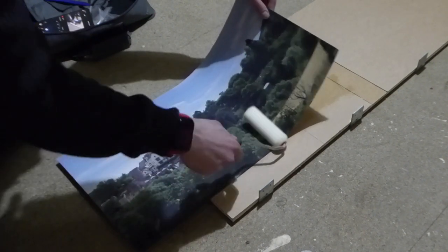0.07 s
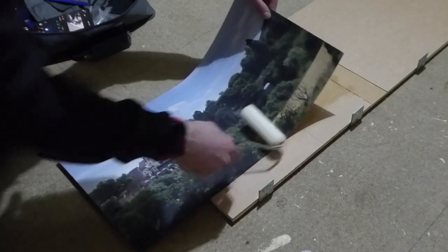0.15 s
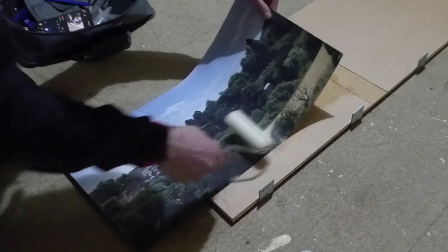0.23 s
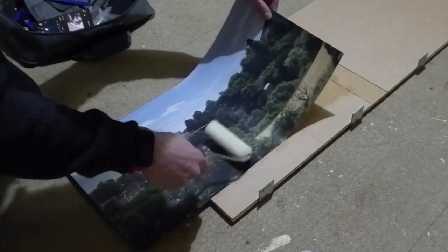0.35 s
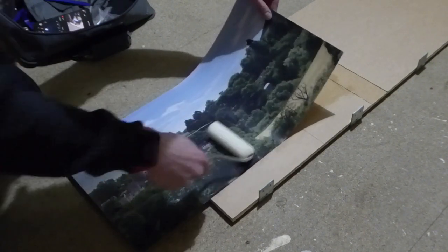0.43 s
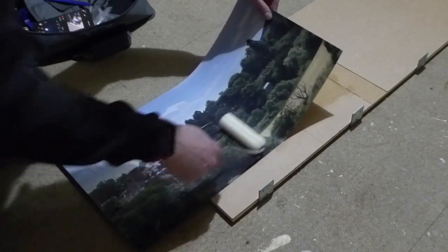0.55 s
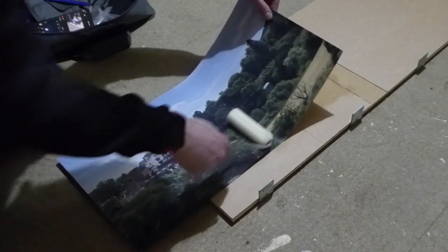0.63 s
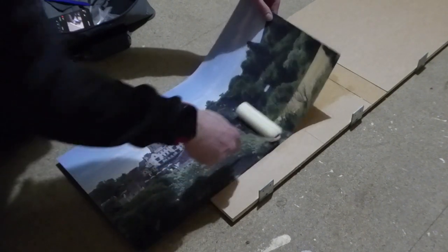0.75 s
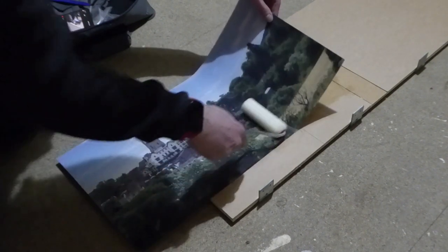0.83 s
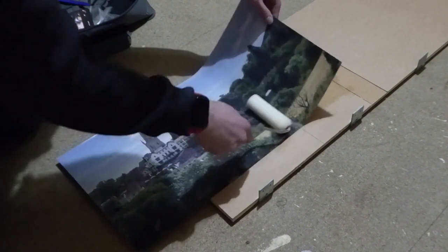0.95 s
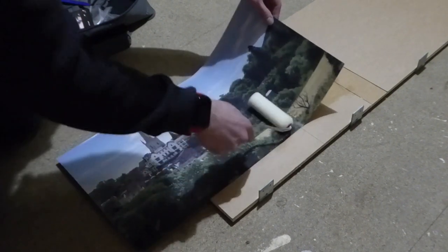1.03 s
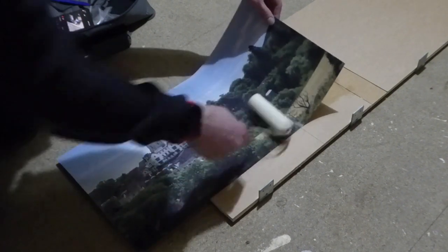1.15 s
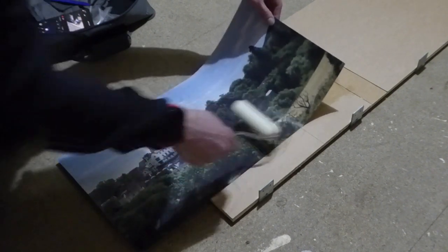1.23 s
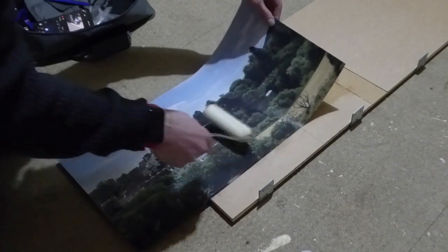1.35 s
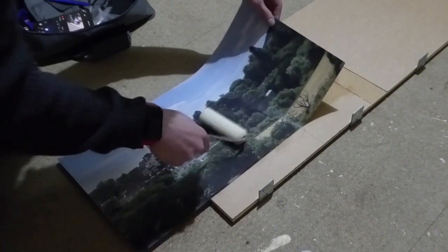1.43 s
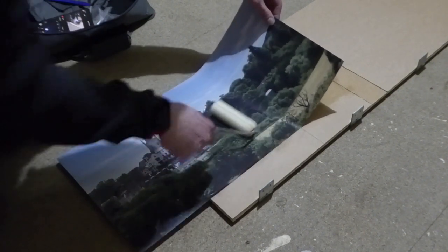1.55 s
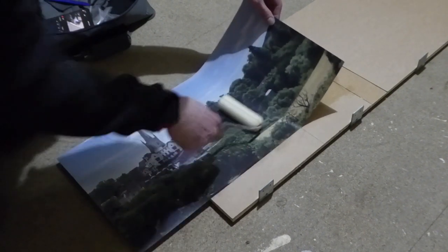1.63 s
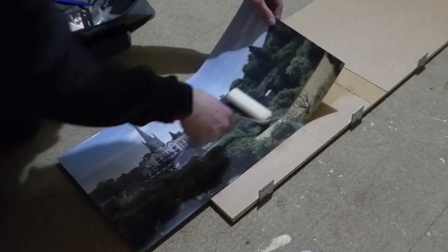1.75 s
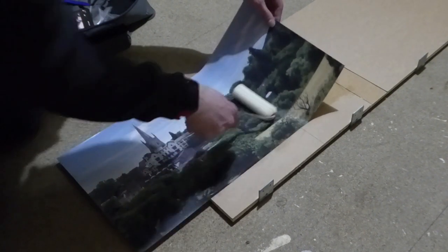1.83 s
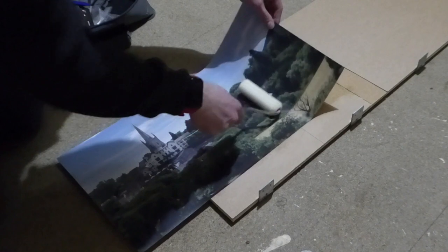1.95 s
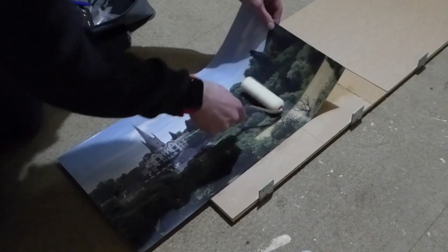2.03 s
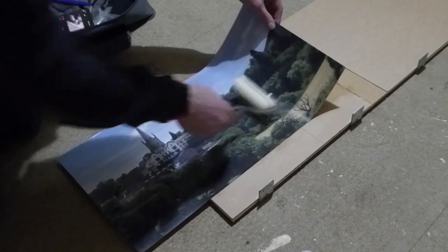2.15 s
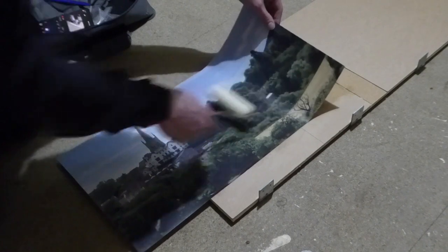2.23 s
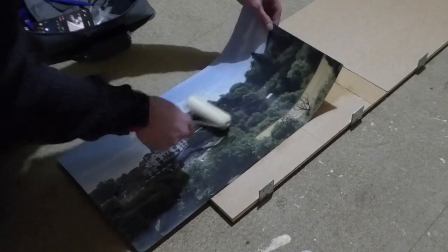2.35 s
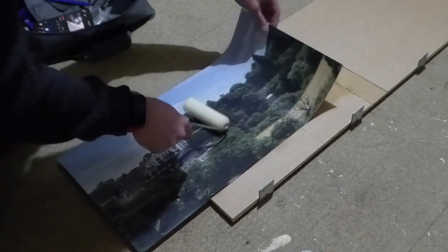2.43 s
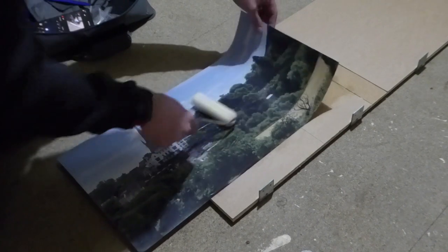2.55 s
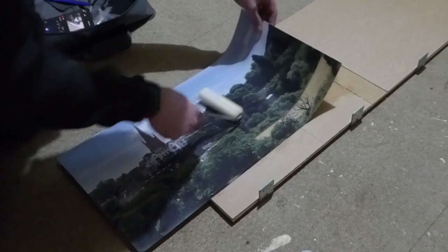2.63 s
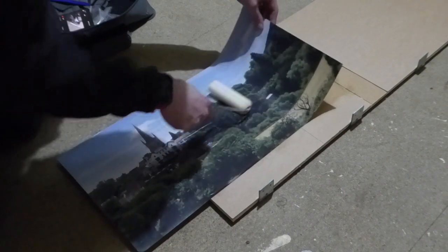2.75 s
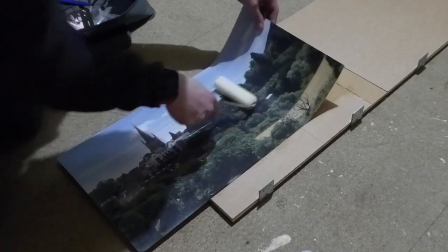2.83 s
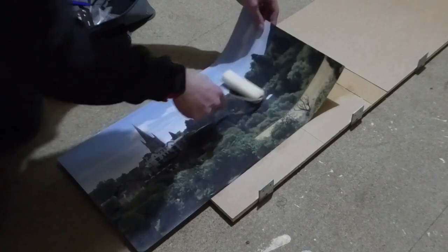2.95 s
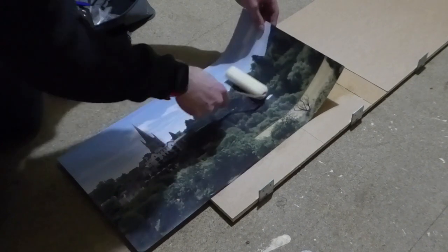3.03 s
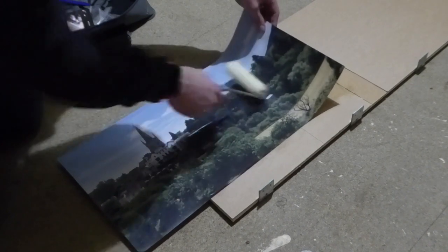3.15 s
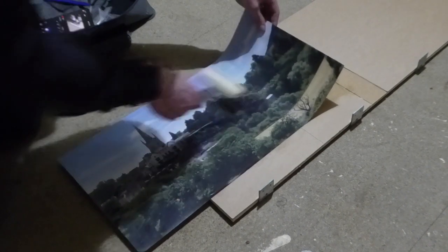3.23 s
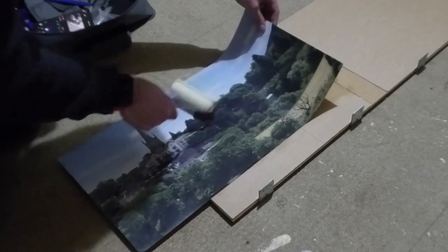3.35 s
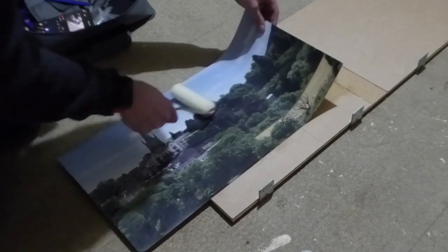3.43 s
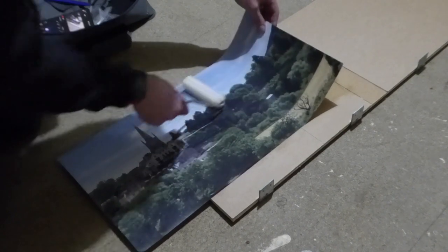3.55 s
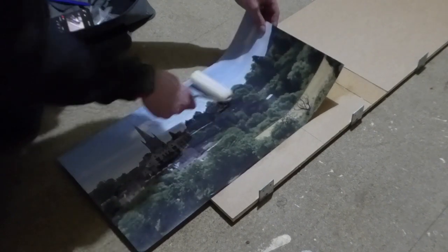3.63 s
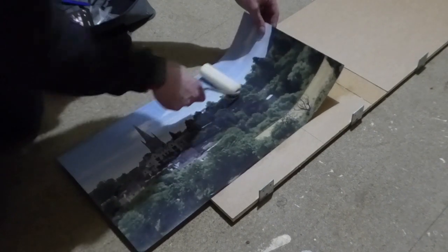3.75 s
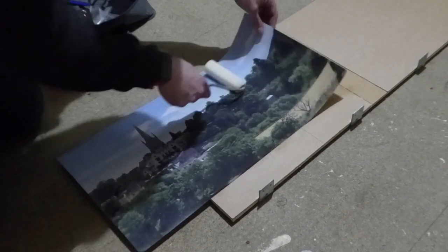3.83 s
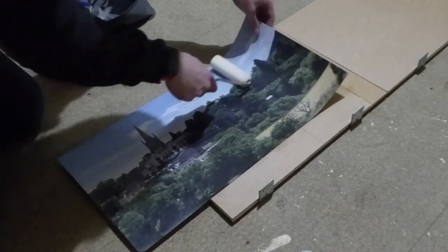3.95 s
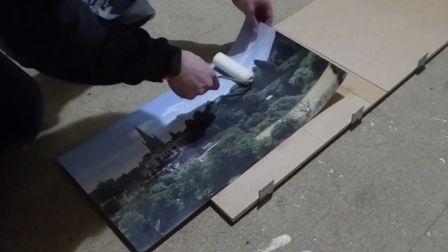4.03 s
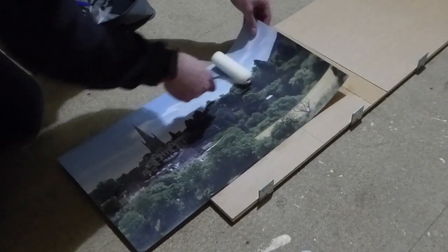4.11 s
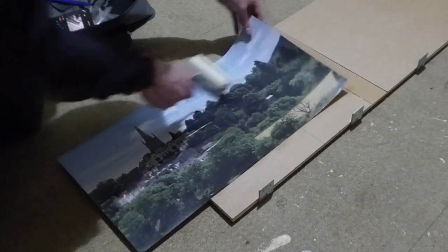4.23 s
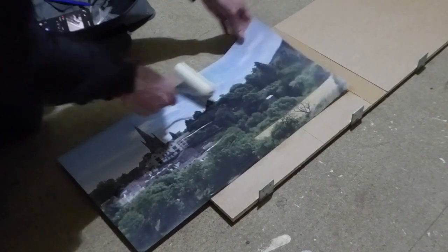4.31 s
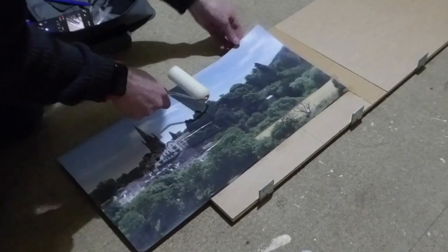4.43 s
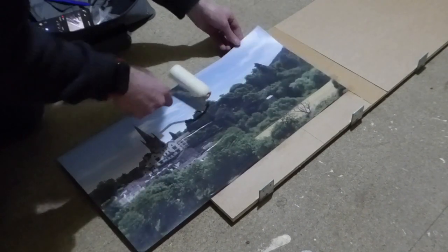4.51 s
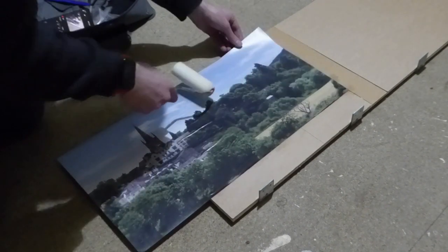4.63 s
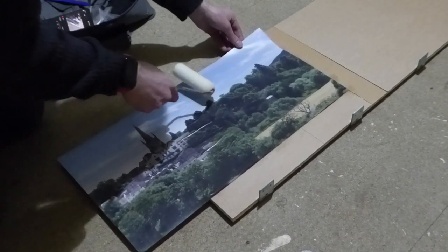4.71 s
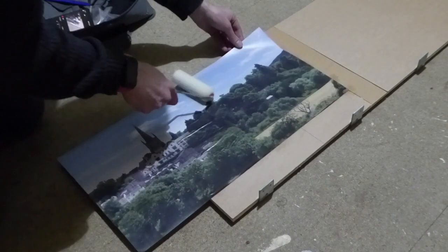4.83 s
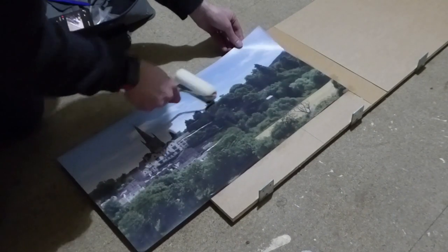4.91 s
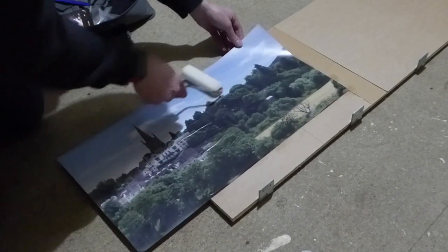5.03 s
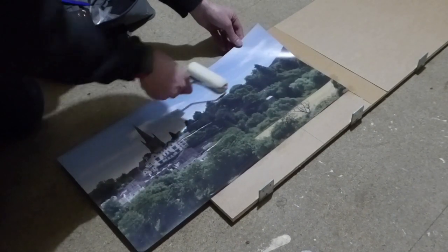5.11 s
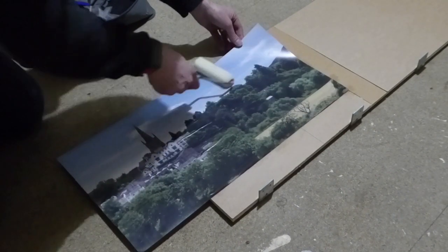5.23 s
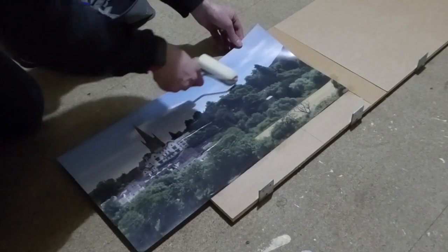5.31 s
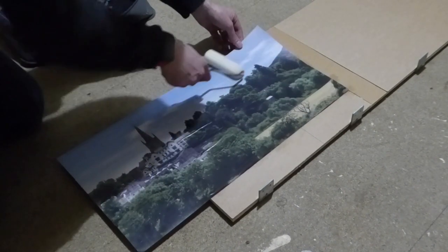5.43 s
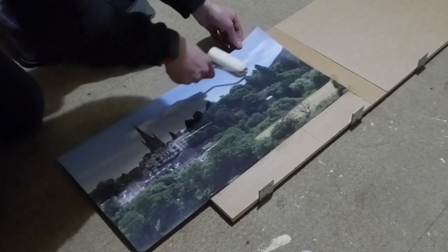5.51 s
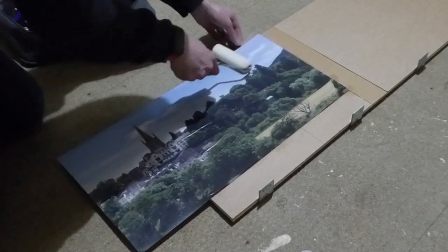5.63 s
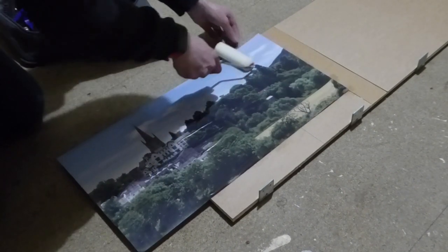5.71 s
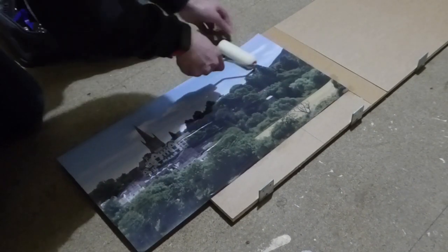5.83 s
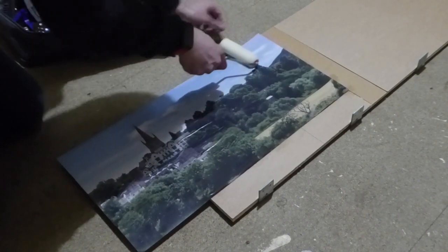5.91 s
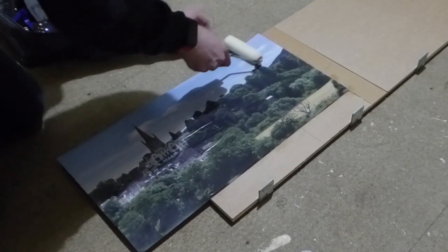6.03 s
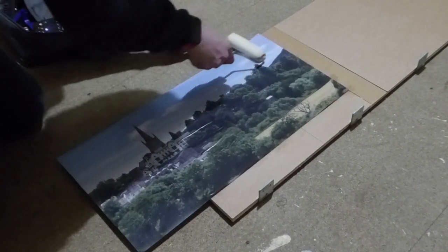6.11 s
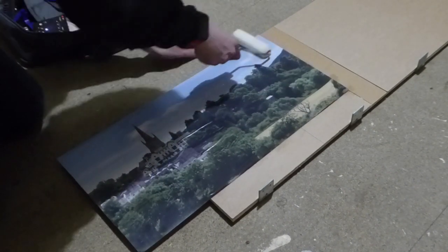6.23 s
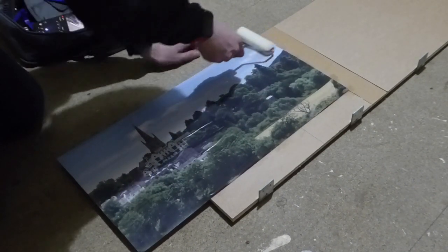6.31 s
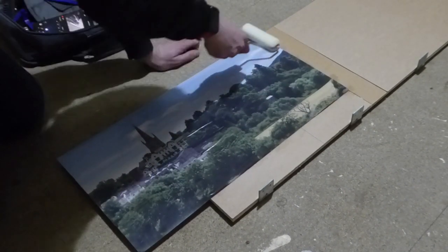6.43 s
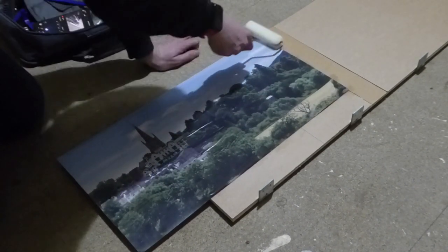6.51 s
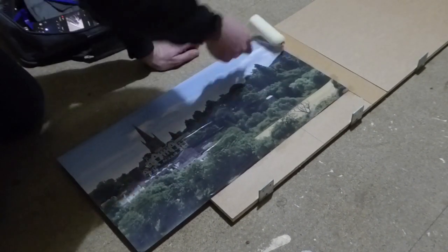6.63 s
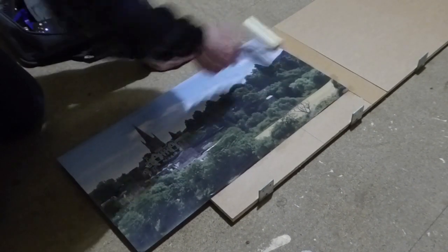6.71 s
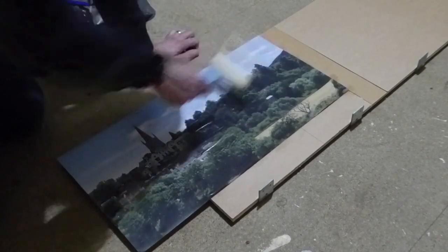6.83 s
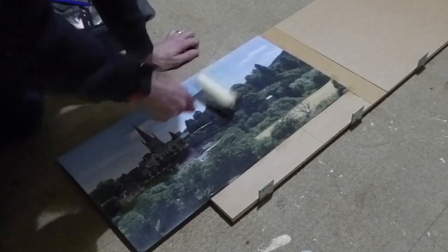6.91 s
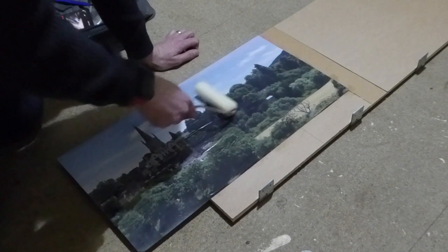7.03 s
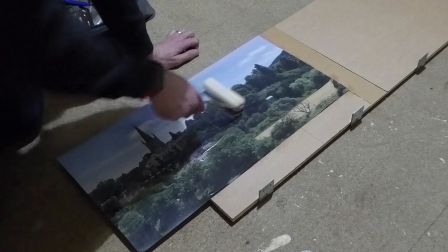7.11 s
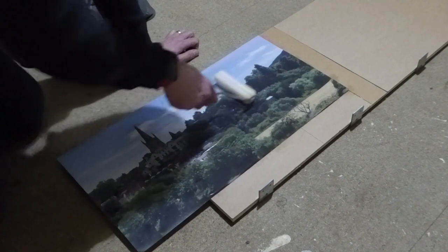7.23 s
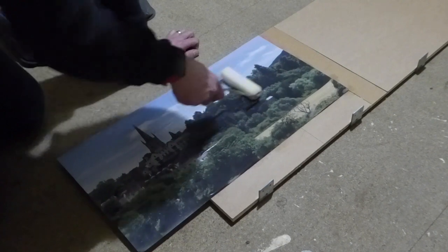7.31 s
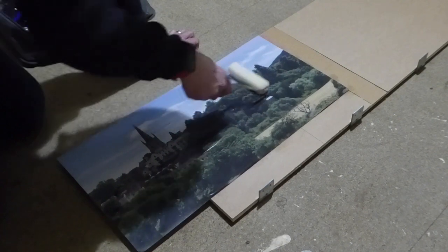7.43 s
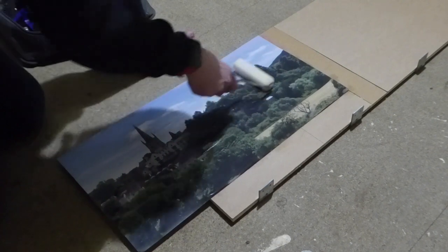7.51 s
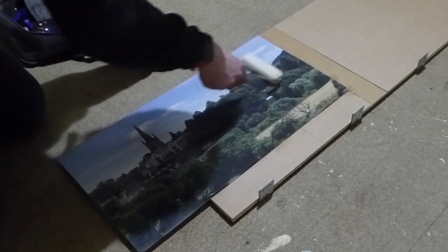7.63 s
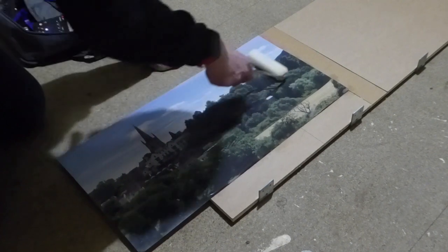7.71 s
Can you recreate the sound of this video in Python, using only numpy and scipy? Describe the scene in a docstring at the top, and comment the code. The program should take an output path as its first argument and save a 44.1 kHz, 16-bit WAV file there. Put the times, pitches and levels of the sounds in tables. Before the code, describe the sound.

Breathy, downward-sliding hisses of a hand roller on glued paper, broken by woody thuds, plastic clacks and axle rattles in a small hard room.

```python
"""A hissing roller thuds, clacks and rattles as it presses a paper print onto a glued board.
Hiss is a crowd of random nap releases, coloured by a comb filter whose notes mostly slide down with the
air gap under the sheet. Thuds are sums of decaying board modes; clacks and rattles are short forces that
excite the roller's resonances. Glue snaps, a faint rustle and a hush lie around them, and a small hard
room answers the contacts with diffuse tails."""
import sys
import numpy as np
from scipy import signal
from scipy.fft import rfft, irfft, next_fast_len
from scipy.io import wavfile
from scipy.ndimage import uniform_filter1d

SR = 44100
rng = np.random.default_rng(int(sys.argv[2]) if len(sys.argv) > 2 else 0)


def pcm_store(signal):
    """Save signal as 16-bit PCM."""
    levels = np.round(np.clip(np.atleast_2d(signal), -1, 1) * 32767)
    wavfile.write(sys.argv[1], SR, levels.astype(np.int16).T)


N = 342216

# relative spectrum of the nap on paper: frequency_hz, level_db
HISS_SPECTRUM = [(250, -80), (420, -59), (530, 3.5), (680, -15.5), (870, 3.5), (1020, -9.5), (1300, -0.5),
                 (1900, 0.5), (2800, -1), (4200, -1), (5500, -10), (8000, -27.5), (11000, -40)]
# relative spectrum of the drumming board and flapping sheet: frequency_hz, level_db
RUMBLE_SPECTRUM = [(50, -55), (110, -10), (155, 3), (210, 4.5), (280, 6.5), (520, 11), (700, -15),
                   (1200, -23.5)]
# relative spectrum of the smallest, brightest contacts: frequency_hz, level_db
TICK_SPECTRUM = [(100, -45), (700, -17), (2000, -7.5), (4000, -13.5), (6300, -4.5), (8000, -8), (9500, 0),
                 (11200, -2), (12800, -10), (14000, -28), (15500, -51)]


def amp(db):
    """Decibels to an amplitude ratio."""
    return 10 ** (np.asarray(db) / 20)


def unit(x):
    """Normalise to an rms of 1."""
    return x / np.sqrt(np.mean(x ** 2) + 1e-20)


def unit_energy(x):
    """Normalise each row to an energy of 1."""
    return x / np.sqrt(np.sum(x ** 2, axis=-1, keepdims=True) + 1e-20)


def along(points, hz):
    """Interpolate (frequency_hz, value) points on a logarithmic frequency axis."""
    f, v = np.transpose(points)
    return np.interp(np.log(hz + 1), np.log(f + 1), v)


def near(hz, centre_hz, octaves, lift_db):
    """Resonant emphasis: a Gaussian of decibels around a centre on an octave scale."""
    return lift_db * np.exp(-.5 * (np.log2((hz + 1) / centre_hz) / octaves) ** 2)


def curves(rows):
    """Linear interpolation: one value per sample for each column after the time."""
    s, *cols = np.transpose(rows)
    return [np.interp(np.arange(N) / SR, s, c) for c in cols]


def bells(rows):
    """Superposed Gaussian envelopes from rows of centre_s, sigma_s, level_db."""
    t = np.arange(N) / SR
    return sum(amp(db) * np.exp(-.5 * ((t - s) / sigma) ** 2) for s, sigma, db in rows)


def random_curves(count, knots):
    """Band-limited wandering: straight lines between normal random values at whole knots."""
    rows = rng.standard_normal((count, int(knots[-1]) + 2))
    return np.array([np.interp(knots, np.arange(len(row)), row) for row in rows])


def drift(knots_per_s):
    """A slow random modulation with a fixed number of knots a second."""
    return random_curves(1, np.arange(N) * knots_per_s / SR)[0]


def filtered(x, response):
    """Linear filtering: multiply the spectrum by a response of frequency."""
    n = x.shape[-1]
    m = next_fast_len(n + 8192)
    return irfft(rfft(x, m) * response(np.fft.rfftfreq(m, 1 / SR)), m)[..., :n]


def coloured(x, spectrum):
    """Spectral shaping of x, normalised to an rms of 1."""
    return unit(filtered(x, lambda hz: amp(along(spectrum, hz))))


def ping(parts, size=2048):
    """Minimum-phase pulse whose power is the sum of parts, each a (level_db, spectrum) pair."""
    hz = np.fft.rfftfreq(size, 1 / SR)
    power = sum((amp(db) * unit(amp(along(spectrum, hz)))) ** 2 for db, spectrum in parts)
    cepstrum = irfft(np.log(power + 1e-14) / 2)
    # folding the cepstrum onto positive times makes the pulse causal
    cepstrum[1:size // 2] *= 2
    cepstrum[size // 2 + 1:] = 0
    return irfft(np.exp(rfft(cepstrum)))


def add(track, s, sound):
    """Superposition: mix a sound in at time s."""
    part = track[:, max(0, round(s * SR)):][:, :sound.shape[-1]]
    part += sound[..., :part.shape[-1]]


def in_room(x, wet_db, size=256):
    """Reverberation: direct sound plus a fresh diffuse tail, as mid and side, that decays band by band."""
    # decay of the room: frequency_hz, t60_s
    decay = [(130, 1), (400, 0.37), (1000, 0.28), (4000, 0.26), (12000, 0.26)]
    hz, t, z = signal.stft(rng.standard_normal((2, SR // 3)), SR, nperseg=size)
    tail = signal.istft(z * amp(-60 * t / along(decay, hz)[:, None]), SR, nperseg=size)[1]
    onset = 1 - np.exp(-np.arange(tail.shape[1]) / SR / 0.0032)
    tail = amp(wet_db) * unit_energy(tail * onset)
    tail[0, 0] += 1  # the direct sound is in the mid alone
    return signal.fftconvolve(x[None], tail, axes=1) / np.sqrt(1 + amp(wet_db) ** 2)


def quick_strokes():
    """Envelope control: each stroke's hiss swells, holds and dies away, with its own fizz level."""
    # quick strokes: start_s, attack_s, hold_s, release_s, hiss_db, fizz_db (over the usual)
    strokes = [(-.1, 0.039, 0.1, 0.18, -47.5, 1), (0.596, 0.082, .36, 0.13, -46.5, 0.5),
               (1.562, 0.32, 0.032, 0.24, -44, 1), (2.616, 0.21, 0.17, 0.18, -46, -2.5),
               (3.58, 0.24, 0.11, 0.28, -43.5, -2.5), (4.641, 0.034, 0.02, 0.037, -58.5, -6),
               (7.184, 0.11, 0.21, 0.82, -44, -3)]
    t = np.arange(N) / SR
    for start, attack, hold, release, db, fizz_db in strokes:
        age = t - start
        rise = np.clip(age / attack, 0, 1)
        fall = np.clip(1 - (age - attack - hold) / release, 0, 1)
        yield amp(db) * rise * fall, fizz_db


def slow_pass(fade_s=0.063, fizz_db=-1.5):
    """Level follows pressure: on a slow pass along the edge the hand eases off and presses on again."""
    # how hard the roller rolls: time_s, hiss_db
    pressure = [(5.08, -74), (5.098, -68), (5.2, -51.5), (5.31, -49), (5.954, -53.5), (6.25, -48),
                (6.35, -50.5), (6.56, -49), (6.604, -50.5), (6.668, -66.5), (6.7, -62)]
    t = np.arange(N) / SR
    inside_s = np.minimum(t - pressure[0][0], pressure[-1][0] - t)
    contact = np.clip(inside_s / fade_s + 1, 0, 1)
    return contact * amp(curves(pressure)[0]), fizz_db


def following(gain, grows):
    """Power law: the level moves by `grows` dB for each dB that the hiss departs from the usual."""
    usual = amp(-45)
    return usual * (gain / usual) ** grows


def crackle(per_second, spread_db):
    """Shot noise, mid and side: countless tiny releases of fibres at random times and sizes."""
    sizes = rng.standard_normal((2, N)) * amp(spread_db * rng.standard_normal((2, N)))
    return unit(sizes * (rng.random((2, N)) < per_second / SR))


def patchy(x, size=1024, depth_db=2.5):
    """Time-varying filtering: the bending sheet favours ever-changing narrow bands."""
    z = signal.stft(x, SR, nperseg=size)[2]
    field = uniform_filter1d(rng.standard_normal(z.shape[1:]), size=3, axis=0)
    field = uniform_filter1d(field, size=6, axis=1)
    return signal.istft(z * amp(depth_db * unit(field)), SR, nperseg=size)[1][:, :N]


def through_gap(x, gap_hz, reflect, fade_hz, size=1024):
    """Repeated reflection: waves bouncing in the gap form a comb of resonances that fades to the treble."""
    hz, t, z = signal.stft(x, SR, nperseg=size, noverlap=size * 3 // 4)
    hz = hz[:, None]
    gap_hz, reflect = (np.interp(t, np.arange(N) / SR, control) for control in (gap_hz, reflect))
    echo = reflect / (1 + (hz / fade_hz) ** 2)
    comb = np.sqrt(1 - echo ** 2) / abs(1 - echo * np.exp(2j * np.pi * hz / gap_hz))
    return signal.istft(z * comb, SR, nperseg=size, noverlap=size * 3 // 4)[1][:, :N]


def gap_whistle(gap_hz, usual_hz=870):
    """Damped cavity modes as narrow-band tones; a short gap leaks more and so rings more broadly."""
    # resonances of the gap: multiple (of the lowest), width_hz (at the usual gap), level_db
    modes = [(1, 42, 0), (1.96, 75, -1.5), (2.85, 140, -4.5)]
    # how well the gap radiates: frequency_hz, level_db
    radiation = [(450, -1), (540, 1), (680, -5), (870, 2), (1050, 0), (1300, 0), (2400, -1.5), (3000, -5),
                 (4500, -13)]
    phase = 2 * np.pi * np.cumsum(gap_hz) / SR
    leak = np.cumsum(np.maximum(gap_hz / usual_hz, .8) ** 2.5) / SR
    out = np.zeros((2, N))
    for multiple, width_hz, db in modes:
        sway = random_curves(4, 2 * width_hz * leak)
        # a long gap weakens its overtones
        overtone = np.minimum(gap_hz / usual_hz, 1) ** (2 * (multiple - 1))
        tone = sway[:2] * np.cos(multiple * phase) + sway[2:] * np.sin(multiple * phase)
        out += amp(db) * overtone * unit(tone)
    return filtered(out, lambda hz: amp(along(radiation, hz)))


def rolling():
    """Friction noise: the nap peels off the paper and hisses; the gap whistles and the board drums."""
    # the air gap lengthens as the roller advances, so its note mostly falls in each stroke:
    # time_s, lowest_hz (before wavering), ring_db
    gap = [(0, 545, 3), (.2, 530, -3), (.62, 1200, -1), (.69, 1120, 0), (.75, 860, -1), (.9, 820, 1.5),
           (.96, 660, -6), (1.01, 550, 0), (1.15, 530, -4), (1.62, 1720, 3), (1.72, 1270, 3),
           (1.78, 900, -4), (1.9, 850, -3), (1.96, 560, -5), (2.14, 530, -3), (2.65, 1350, -4),
           (2.78, 1250, -4), (2.84, 900, -3), (2.98, 870, 1), (3.04, 600, -7), (3.15, 550, -3),
           (3.62, 1260, 1), (3.69, 1080, 3), (3.76, 1080, 4), (3.84, 980, 4), (3.89, 860, 1),
           (3.96, 880, 1), (4.01, 820, -7), (4.7, 700, -6), (5.1, 1250, -2), (5.22, 1330, 2),
           (5.27, 1080, -1), (5.33, 880, 3), (5.44, 870, 3), (5.5, 1010, -2), (5.59, 860, 2),
           (5.64, 840, -3), (5.72, 650, -14), (5.78, 520, -1), (6.12, 520, 0), (6.17, 700, -8),
           (6.23, 880, 2), (6.35, 880, -2), (6.43, 860, 2), (6.62, 830, -4), (7.215, 1550, 7),
           (7.25, 1290, 7), (7.3, 950, 2), (7.39, 830, 2), (7.52, 820, -4), (7.6, 800, -6), (7.66, 870, -2),
           (7.76, 900, 0)]
    # relative spectrum of the finest, brightest releases: frequency_hz, level_db
    fizz_spectrum = [(4500, -1), (7000, -3.5), (8500, -5), (10500, 0.5), (12000, -3.5), (13300, -14),
                     (15000, -51)]
    # relative spectrum of the coarser fibres: frequency_hz, level_db
    fibre_spectrum = [(1500, -5), (2800, -8.5), (4400, -1.5), (5600, -16.5), (8000, -28.5)]
    # the roller bumps over ripples in the sheet: centre_s, sigma_s, level_db
    ripples = [(0.865, 0.013, -51), (1.007, 0.016, -62), (1.905, 0.013, -46), (2.113, 0.013, -60),
               (5.476, .02, -65), (6.143, 0.01, -60)]
    fizz_lag_s = 0.012

    t = np.arange(N) / SR
    gains, fizz_dbs = map(np.array, zip(*quick_strokes(), slow_pass()))
    # the sleeve presses unevenly as it turns
    hiss_gain = gains.sum(0) * amp(0.73 * drift(knots_per_s=33))
    gap_hz, ring_db = curves(gap)
    gap_hz = gap_hz * (1 + .03 * drift(knots_per_s=30))

    hiss = coloured(patchy(crackle(15000, spread_db=-2.0)), HISS_SPECTRUM)
    reflect = np.minimum(.4 * amp(ring_db), .55)
    hiss = through_gap(hiss, gap_hz, reflect, fade_hz=2600)

    # the whistle's level flickers
    whistle_db = -11.5 + ring_db + 3 * drift(knots_per_s=35)
    whistle = following(gains.sum(0), grows=.8) * amp(whistle_db) * gap_whistle(gap_hz)

    # fizz trails the hiss
    fizz_gain = amp(-6.5 + fizz_dbs) @ following(gains, grows=0.77)
    fizz_gain = np.interp(t - fizz_lag_s, t, fizz_gain)
    fizz = fizz_gain * coloured(crackle(15000, spread_db=0.0), fizz_spectrum)

    # coarser fibres let go one by one
    fibre_gain = amp(-8) * following(hiss_gain, grows=1.1)
    fibres = fibre_gain * coloured(crackle(900, spread_db=-5), fibre_spectrum)

    drum_gain = amp(-37.5) * following(hiss_gain, grows=0.14) + bells(ripples)
    drum = drum_gain * coloured(rng.standard_normal((2, N)), RUMBLE_SPECTRUM)
    return amp(-0.3) * hiss_gain * hiss + fibres + whistle + fizz + drum


def handling():
    """Modulated noise: sleeve and paper rustle faintly, the sheet swishes and the board stirs."""
    # the loose end of the sheet slides and whispers: centre_s, sigma_s, level_db
    swishes = [(3.108, .025, -65), (3.425, 0.025, -62), (4.497, 0.18, -69.5), (6.76, 0.12, -63.5)]
    # relative spectrum of the sliding sheet: frequency_hz, level_db
    swish_spectrum = [(2000, -25), (5000, -4), (8000, -8), (11000, 3), (12800, -8), (14500, -20)]
    # relative spectrum of the board under the hands: frequency_hz, level_db
    stir_spectrum = [(60, -22), (110, -10.5), (150, -3), (210, -8.5), (400, -10), (900, -24)]
    rustle_gain = amp(-72.5 + 3.5 * drift(knots_per_s=7))
    rustle = rustle_gain * coloured(rng.standard_normal((2, N)), HISS_SPECTRUM)
    swish = bells(swishes) * coloured(crackle(4000, spread_db=-2), swish_spectrum)
    stir_gain = amp(-68.5 + 4.5 * drift(knots_per_s=8))
    stir = stir_gain * coloured(rng.standard_normal((2, N)), stir_spectrum)
    return rustle + swish + stir


def chatter(chatter_db, t60, size=2048):
    """Contact force: one impulse and a decaying random buzz, with its colour partly evened out."""
    decay = amp(-60 * np.arange(size) / SR / t60)
    force = amp(chatter_db) * unit_energy(rng.standard_normal(size) * decay)
    force[0] += 1
    spectrum = rfft(force)
    return unit_energy(irfft(spectrum / np.sqrt(abs(spectrum)))[:size // 2])


def roller_knock(hollow_db, ring_hz, ring_db, clack_db, clack_hz, focus, tick_db, force):
    """Forced resonance: the contact force rings the tube, plastic core and wire frame."""
    # ranges in which the roller and its frame ring: frequency_hz, level_db
    body = [(100, -40), (200, -26), (480, -6.5), (680, -4), (900, 0.5), (1300, -2), (1700, -14.5),
            (2600, -6.5), (6000, -100)]
    # the clack, whose pitch depends on the contact: multiple (of that pitch), level_db (at focus 1)
    clack_shape = [(.03, -65), (.15, -35), (.42, -12.5), (.7, -0.5), (1, 2.5), (1.3, 2.5), (1.7, -3),
                   (2.2, -16.5), (3.2, -40)]
    grid = np.geomspace(100, 8000, 80)
    hollow = np.transpose([grid, along(body, grid) + near(grid, ring_hz, 0.35, lift_db=ring_db)])
    clack = [(multiple * clack_hz, focus * db) for multiple, db in clack_shape]
    return signal.fftconvolve(force, ping([(hollow_db, hollow), (clack_db, clack), (tick_db, TICK_SPECTRUM)]))


def board_thud(spot_hz, spot_db, bass_db, damping, flap_db):
    """Modal synthesis: the struck spot favours some board modes; the sheet flaps briefly on top."""
    # modes of the board on the floor: frequency_hz (before detuning), level_db, t60_s (at damping 1)
    board_modes = [(129.5, -10.5, 0.47), (143, -6, 0.25), (158.7, -1.5, 0.34), (258.4, 1.5, 0.27),
                   (285.3, -6.5, 0.31), (371, 0.5, 0.25), (418, -10, 0.22), (463.6, -5, 0.36),
                   (519, 2, 0.23), (551, -0.5, 0.21), (680, -17, 0.44)]
    t = np.arange(SR // 4) / SR
    hz, db, t60 = np.transpose(board_modes)[:, :, None]
    detune, phase = rng.standard_normal((2, len(board_modes), 1))
    level = db + near(hz, spot_hz, 0.32, lift_db=spot_db) + near(hz, 130, 0.4, lift_db=bass_db)
    build = 1 - np.exp(-(t * hz / 1.53) ** 2)  # build-up over 1.53 cycles
    envelope = build * amp(level - 60 * damping * t / t60)
    modes = envelope * np.sin(2 * np.pi * hz * (1 + 0.0073 * detune) * t + np.pi * phase)
    flap = coloured(rng.standard_normal(len(t)), RUMBLE_SPECTRUM)
    flap = flap * amp(-60 * t / 0.32) * (1 - np.exp(-(t / 0.003) ** 2))
    return unit_energy(unit_energy(modes.sum(0)) + amp(flap_db) * unit_energy(flap))


def rattles():
    """Impact with play: lifted, swung back or rebounding, the roller slides on its axle and taps the frame."""
    # shifts on the axle: start_s, knock_db, tube_hz, tube_ring_db, hardness_db (clack over knock),
    # clack_hz, tick_db, chatter_db, thud_db
    shifts = [(0.204, -11.5, 1220, 8, 2.5, 3020, -20.5, -10, -29),
              (1.2113, -18.5, 1186, 7, -3, 2600, -32, -4, -42),
              (1.3177, -18.5, 820, 6, -2.5, 4300, -30, 8, -22.5),
              (1.544, -20, 880, 8, -17, 3240, -36, 8, -29), (2.158, -24.5, 900, 8, -5, 4140, -34, 12, -25),
              (2.171, -14, 1080, 6, -8.5, 4070, -29, 8, -22),
              (3.191, -15.5, 804, 1, -1.5, 2700, -26, 14, -22.5),
              (3.202, -15, 800, 2, -4.5, 2680, -32, -8, -28),
              (3.277, -10, 1080, 13.5, -15, 4770, -39, -1, -21.5),
              (3.454, -16, 650, 7, -1, 2540, -30, 6, -22), (4.22, -12.5, 1110, 9, -0.5, 2820, -26, 1, -33),
              (4.286, -14, 766, -2, -5, 2550, -29, 4, -23), (4.447, -27.5, 700, 3, -6, 2600, -42, 18, -30),
              (6.719, -22, 950, 11, -19, 3240, -42, 10, -27.5),
              (6.73, -19.5, 880, 10, -11, 3240, -38, 4, -34), (6.915, -38.5, 890, 0, 14, 3900, -31, 3, -36),
              (6.9595, -24.5, 810, 7, 1.5, 2850, -28.5, 9, -27),
              (7.1024, -20, 700, 4, 2, 3400, -4, -8, -5.5)]
    out = np.zeros((2, N))
    for s, db, ring_hz, ring_db, hardness_db, clack_hz, tick_db, chatter_db, thud_db in shifts:
        thud = board_thud(spot_hz=470.0, spot_db=7.5, bass_db=-6, damping=1.45, flap_db=-3.5)
        add(out, s, amp(thud_db) * in_room(thud, wet_db=-12.5))
        force = chatter(chatter_db, t60=0.023)
        knock = roller_knock(db, ring_hz, ring_db, db + hardness_db, clack_hz, 0.7, tick_db, force)
        # harder contacts sound drier
        add(out, s, in_room(knock, wet_db=1 - 0.14 * hardness_db))
    return out


def landings():
    """Two-stage impact: the roller's soft sleeve meets the board just before the clack."""
    # the roller is set down: clack_s, thud_db, spot_hz (favoured board pitch), spot_db, bass_db (lowest modes),
    # damping (factor), hollow_db, tube_hz, clack_db, clack_hz, focus (more is narrower), tick_db, chatter_db
    contacts = [(.5192, .5, 294, 1.6, 2.5, 1.1, -7.5, 920, -2.5, 3160, 0.91, -13, -2),
                (1.5555, 1.5, 260, 2, 5.5, 1.33, -26, 520, -15.5, 2630, 0.57, -33, 12),
                (2.5333, -9, 262, 12, 2.5, 1, -8.5, 880, -5, 3300, 0.95, -14, 1),
                (3.5128, 0, 400, 1, -0.5, 1.01, -12.5, 885, -5, 2680, 0.53, -5, -13),
                (4.925, -4.5, 415, 4.4, 7.5, 1.4, -14, 500, -3, 4370, 4.9, -5, 2),
                (7.0941, 2, 320, 5.1, 0, 1.37, -3, 945, 10, 3310, 1.5, -2, -5)]
    out = np.zeros((2, N))
    for (s, thud_db, spot_hz, spot_db, bass_db, damping, hollow_db, ring_hz,
         clack_db, clack_hz, focus, tick_db, chatter_db) in contacts:
        thud = board_thud(spot_hz, spot_db, bass_db, damping, flap_db=-7)
        add(out, s - .0028, amp(thud_db) * in_room(thud, wet_db=-21.0))
        force = chatter(chatter_db, t60=0.02)
        knock = roller_knock(hollow_db, ring_hz, 7, clack_db, clack_hz, focus, tick_db, force)
        add(out, s, in_room(knock, wet_db=1.0))
    return out


def glue_snaps():
    """Impulsive release: tacky glue lets go under the sheet with tiny bright snaps."""
    # releases of the glue: start_s, level_db
    releases = [(3.1004, -27), (3.2122, -26), (3.8013, -21), (3.935, -21), (5.7082, -26)]
    out = np.zeros((2, N))
    for s, db in releases:
        snap = signal.fftconvolve(chatter(chatter_db=3, t60=.015), ping([(db, TICK_SPECTRUM)]))
        add(out, s, in_room(snap, wet_db=-2))
    return out


def scene():
    """Superposition of all sources as mid and side, spread to left and right over the room's wider hush."""
    # relative spectrum of the hush: frequency_hz, level_db
    hush_spectrum = [(13, -47), (22, -14), (44, -29), (127, -14), (273, -8), (572, -9.5), (713, -11.5),
                     (1340, -13.5), (1450, -18), (1580, -21), (1860, -16), (4460, -19.5), (4850, -16),
                     (5870, -23), (15300, -30)]
    # stereo width: frequency_hz, side_db
    width = [(30, 4), (70, -15), (200, -7.5), (500, -5), (1000, -3), (2000, -6), (4000, -9), (8000, -5.5),
             (13000, -6)]
    # stereo balance: frequency_hz, left_minus_right_db
    balance = [(250, 0), (500, 0), (1000, 2.5), (2000, 1.5), (4000, 1), (9000, 1)]
    hush = amp([[-61.2], [-58.5]]) * coloured(rng.standard_normal((2, N)), hush_spectrum)
    sources = rolling() + landings() + rattles() + glue_snaps() + handling()
    # low cut: all the sources are thin below 90 Hz, while the hush keeps its deep bass
    low_cut = signal.butter(3, 90, "high", fs=SR, output="sos")
    mid, side = signal.sosfilt(low_cut, sources) + hush
    side = filtered(side, lambda hz: amp(along(width, hz)))
    left_right = np.array([mid + side, mid - side])
    return filtered(left_right, lambda hz: amp(np.outer([.5, -.5], along(balance, hz))))


def record(dry):
    """Low-pass filtering: the treble falls away steeply above 14 kHz and ends at 15.5 kHz."""
    return filtered(dry, lambda hz: (hz < 15500) / np.sqrt(1 + (hz / 14000) ** 30))


dry = scene()
out = record(dry)
pcm_store(out)
```